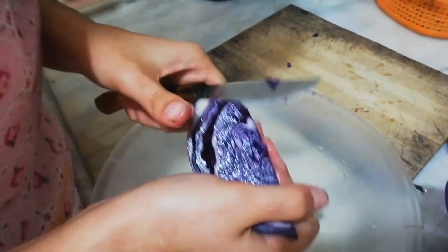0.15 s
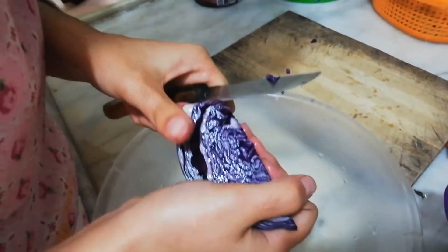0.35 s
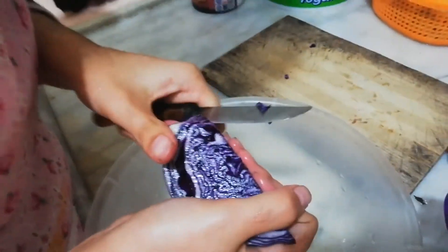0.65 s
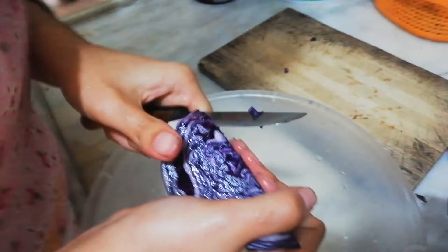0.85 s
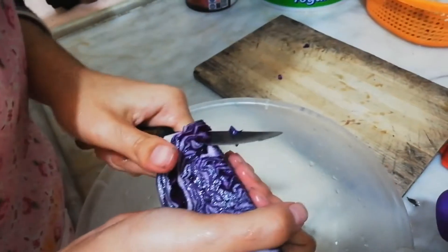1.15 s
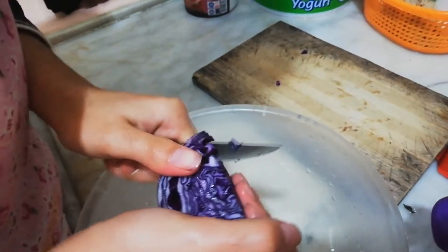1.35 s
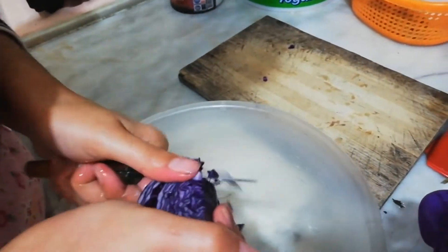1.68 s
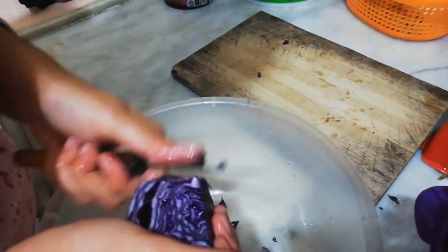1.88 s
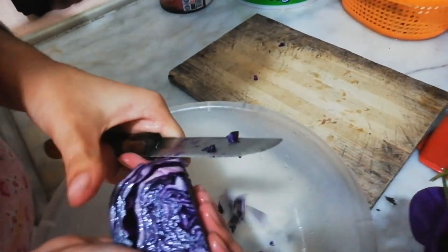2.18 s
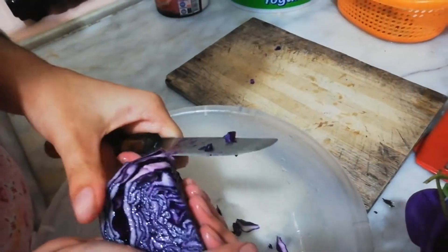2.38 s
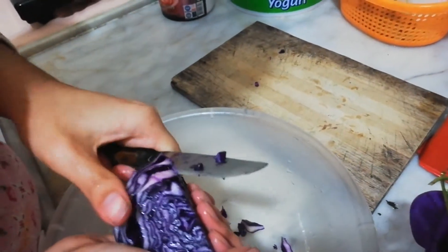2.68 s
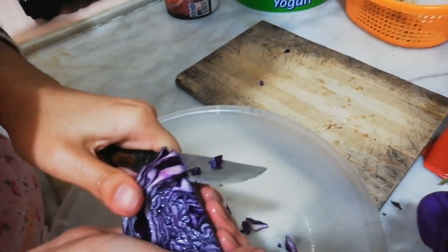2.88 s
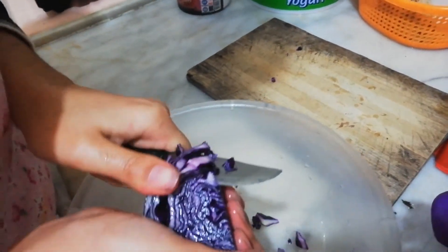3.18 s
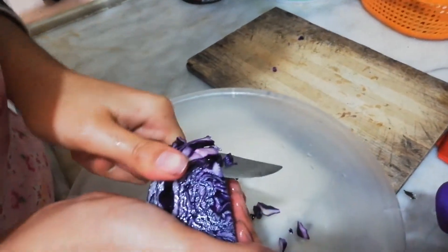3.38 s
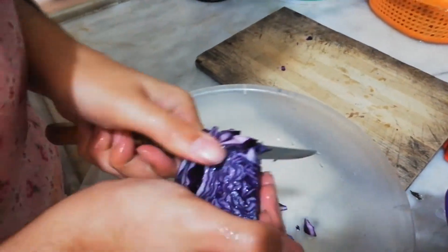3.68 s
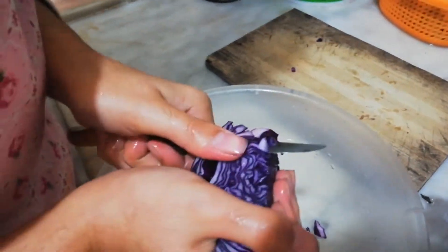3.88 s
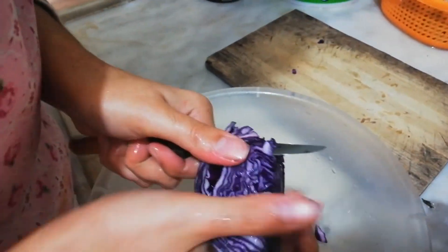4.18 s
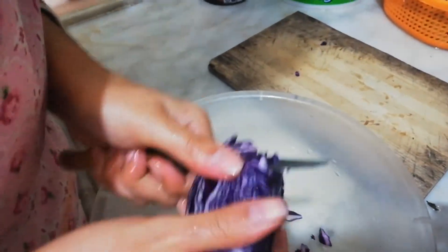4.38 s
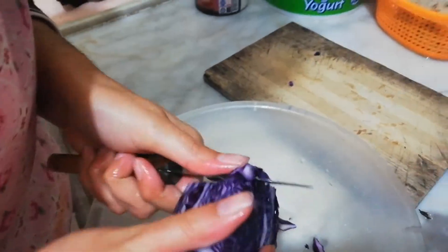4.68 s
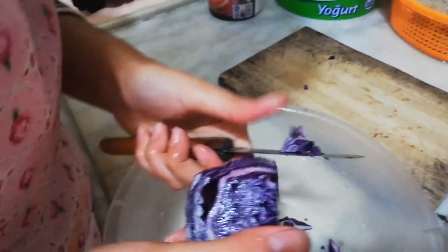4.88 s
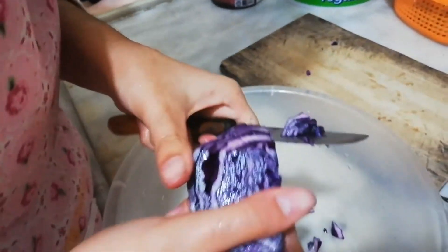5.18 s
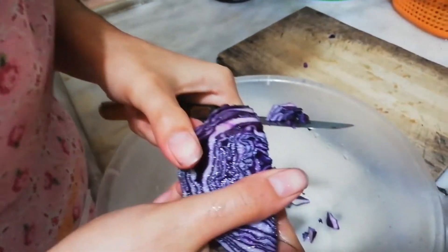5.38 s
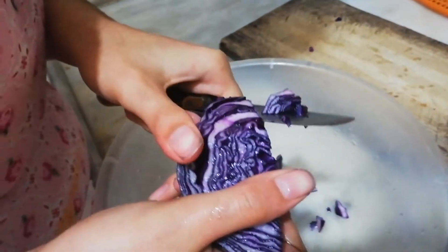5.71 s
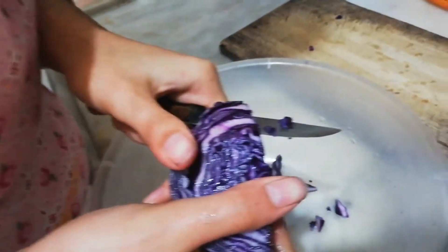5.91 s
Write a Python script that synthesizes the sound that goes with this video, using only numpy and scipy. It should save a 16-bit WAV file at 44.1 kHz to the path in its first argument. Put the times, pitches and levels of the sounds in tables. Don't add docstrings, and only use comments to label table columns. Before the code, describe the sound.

Close, bright cabbage crunches and fibre snaps, scraps dropping and bouncing in a plastic bowl, distant knocks and pan clatter, then water hissing into a steel sink.

```python
import sys
import numpy as np
from scipy import signal
from scipy.fft import rfft, irfft
from scipy.io import wavfile
from scipy.ndimage import uniform_filter1d

SR = 44100
rng = np.random.default_rng(int(sys.argv[2]) if len(sys.argv) > 2 else 0)


def master(y):
    cut = np.clip(np.atleast_2d(y).T, -1, 1)
    pcm = np.round(cut * 32767)
    wavfile.write(sys.argv[1], SR, pcm.astype(np.int16))


def gain_from_db(level_db):
    decades = np.asarray(level_db, float) / 20
    return 10 ** decades


N = 266805

# start_s, peak_db, length_ms, left_over_right_db
LEAVES = [(0.189, -44.5, 5.3, 3), (0.9362, -18, 5.3, 1), (1.1032, -12.5, 2.7, 1.5), (1.1581, -10, 4.3, 1),
          (1.4185, -13, 4.5, 1), (1.505, -14, 5.7, 0.5), (1.7133, -12, 7, 1.5), (2.618, -11, 7.7, 6),
          (2.6396, -13.5, 5.4, -2.5), (2.7755, -15.5, 5, 0), (2.8759, -16, 6.8, 2.5),
          (2.9856, -15, 11, 2.5), (3.1584, -12, 10.1, 2.5), (3.3437, -12.5, 5.9, -0.5),
          (3.5371, -16.5, 7.3, 8.5), (3.628, -30, 3.4, -2), (3.7715, -27, 4, -4), (3.7996, -29, 7.5, -6),
          (3.925, -13.5, 4.3, 0), (4.3205, -18, 4.5, 1.5), (4.341, -20, 5, 5), (4.3613, -27, 6.7, -2.5),
          (4.4263, -42.5, 6.3, 4), (5.3359, -15, 4.15, 1.5), (5.5462, -13, 8.8, -1), (5.8066, -9.5, 9.1, 1)]
# start_s, peak_db, length_ms, body_over_snap_db
RIBS = [(0.7399, -26.5, 9.2, 3.5), (.833, -30, 8, -14), (0.842, -15.5, 8, -14), (1.662, -19.5, 12.4, -10),
        (1.8994, -31, 6.2, -9), (2.5395, -30, 6, -14), (2.548, -23, 6, -14), (2.7352, -27.5, 7.7, -15.5),
        (4.093, -19.5, 5, -8), (4.5456, -14, 3, -23), (5.2934, -35, 6.8, -16), (6.0164, -20.5, 3.9, -1)]
# start_s, peak_db, body_over_snap_db
SNAPS = [(0.2364, -41.5, 1.5), (2.6155, -20, -20), (2.639, -13, -38), (2.933, -36, -30), (2.978, -30, -30),
         (3.0015, -19, -15), (3.0761, -44, -30), (3.0936, -43, -30), (3.154, -22, -30), (3.1624, -15, -30),
         (3.4847, -34, -30), (3.7202, -29, -25), (3.8549, -35, -25), (4.3195, -18, -25), (4.332, -33, -20),
         (3.1197, -21, -42), (3.1395, -28.5, -34), (3.605, -36, -20), (3.6421, -21, -15),
         (3.682, -10, -26.5), (3.875, -33, -30), (4.132, -26.5, 1.5), (4.2035, -30, -5), (4.6311, -26, -19),
         (4.6593, -44, -12), (4.706, -41, -7), (5.3243, -22, -15)]
# pitch_hz, level_db
FIZZ = [(400, -70), (1500, -30), (3000, -1.5), (6000, -2.5), (10000, 7), (16000, -16)]
# pitch_hz, level_db
SCRAPE = [(80, -54), (250, -8.5), (500, -14), (1300, -1.5), (2500, -5.5), (5000, -14.5)]
# start_s, peak_db, pitch_hz, tick_over_ring_db
DROPS = [(0.465, -40.5, 610, -11), (1.758, -30.5, 570, -32), (1.788, -41, 600, -32),
         (1.825, -40.5, 560, -26), (1.8652, -7, 1250, -30), (1.9565, -23, 1150, -30),
         (2.359, -30, 1220, -24), (3.746, -31, 1606, -9), (3.822, -39.5, 1320, -5), (4.251, -24, 640, -20),
         (4.641, -38, 1247, -5.5), (4.686, -28.5, 2240, -8), (4.735, -46.5, 1490, -8),
         (4.888, -24.5, 1180, -9), (4.896, -7, 1650, -16), (4.986, -16.5, 1410, -11.5),
         (4.989, -11, 1750, -11.5), (5.059, -34.5, 900, -8), (5.14, -37, 780, -32),
         (5.189, -21.5, 1390, -28.5),
         (1.8625, -20, 1000, -30), (1.875, -23, 1800, -30), (1.891, -27, 1200, -30),
           (1.671, -14, 1500, -30), (1.965, -25, 1200, -35), (4.089, -24, 1600, -30),
           (4.172, -20, 1500, -30), (4.901, -20, 2200, -30), (4.996, -24, 1200, -25), (5.066, -42, 2500, 0),
           (5.198, -30, 1700, -30)]
# start_s, peak_db, pitch_hz, tick_over_ring_db, thump_over_ring_db
CHUNKS = [
    (1.667, -5.5, 1600, -13.5, -19),
    (4.074, -15, 1300, -20, -3),
    (4.1315, -22, 1800, -3, -12),
    (4.168, -9, 1700, -32, -6),
    (4.976, -29.5, 1607, -24, -14),
    (5.034, -40, 428, -25, -12),
    (5.098, -30.5, 1300, -37, -17),
    (5.355, -31, 450, -25, -16),
    (6.002, -7, 550, -22, -8),
]
# pitch_hz, level_db
BOWL = [(250, -13.5), (500, -0.5), (1000, 3), (1500, 4), (2200, 4), (3200, 2), (4500, -24.5)]
# pitch_hz, level_db
TICK = [(1200, -50), (2500, 6), (5000, -2), (9000, -11), (14000, -27.5)]
# peak_s, fade_20_db_s, fizz_db, scrape_over_fizz_db
STROKES = [(0, 0.12, -50.5, 4.5), (.2, .5, -63.5, 0), (.6, 0.13, -50.5, -7.5), (1.1, 0.5, -52.5, 2.5),
           (1.45, 0.43, -46, -19), (1.615, .06, -50.5, 11.5), (1.685, 0.14, -41.5, -9),
           (1.892, 0.03, -71.5, 25), (2.44, 0.14, -66, 20), (2.6, 0.35, -51, -23), (2.95, .2, -50, -40),
           (3.34, .35, -47.5, -9.5), (3.55, 0.12, -41, -12), (3.645, .09, -39, -16), (3.69, .09, -38, -20),
           (3.77, .2, -35, -16), (4.11, .16, -44.5, -40), (4.5, 0.7, -58, -20), (4.9, 0.2, -60.5, -8),
           (5.25, 0.2, -57.5, -6)]
# start_s, level_db, rattle_s, thud_over_ring_db, brightness_db_per_octave
CLATTER = [
    (2.053, -23, 0.014, 2, -1.5),
    (2.077, -29, 0.022, 7, 2),
    (2.104, -34, .03, 7, 1),
    (2.14, -38, .03, 6, -1),
    (2.161, -33, 0.024, 7, -2.5),
    (2.18, -33.5, .026, 6, 1),
    (2.204, -37, 0.014, 6, -1),
    (2.226, -44, .012, 9, -5),
    (2.243, -29, .02, 0, 1.5),
]
# pitch_hz, level_db, fade_60_db_s
PAN = [(1927, 3, 0.06), (2530, -2, .05), (2700, 5, 0.07), (3750, -3, 0.06), (3950, 3, 0.045),
       (5600, -8, 0.15), (6503, -1, 0.2), (7000, -4, .15), (7720, 4, 0.23), (8600, -2, 0.15),
       (9114, 3, .14), (9590, -1, 0.08), (10300, -2, .15), (10900, -3, 0.17)]
# pitch_hz, level_db
THUD = [(71, -29), (370, -4.5), (1400, -10), (3900, -11.5), (4700, -23), (9400, -5.5), (14700, -23.5),
        (16000, -42.5)]
# start_s, level_db, rattle_s, thud_over_ring_db
SETTLING = [
    (2.394, -42, .025, -3),
    (2.43, -49, .015, -4),
    (2.475, -39, .006, -10),
    (2.485, -39, .01, -9),
]
# pitch_hz, level_db, fade_60_db_s
RIM = [(420, -7, .06), (2530, 2, .05), (2720, 2, .08), (3850, -8, .05), (6500, -17, .08), (9000, -13, .06)]
# start_s, level_db, rattle_s
KNOCKS = [
    (0.5855, -30, 0.065),
    (0.9665, -31, 0.05),
]
# pitch_hz, level_db, fade_60_db_s
CUPBOARD = [(280, -5.5, 1.0), (424, 7, 2.9), (761, 21, 0.28), (1040, -10.5, 1.1), (1216, 20, 0.47),
            (1561, -16, 0.35), (1477, 22, 0.73), (1740, -6, 1.1), (1900, 21, 0.54), (2630, 7, 0.27),
            (2760, -0.5, 1), (3526, -15, 0.95), (3736, -6.5, 1.4), (4500, 8, 0.11)]
# pitch_hz, level_db
KNOCK_AIR = [(150, -40), (450, -30), (660, -5), (1300, -7), (1950, -6), (2500, -13), (5000, -20),
             (9580, -22), (15500, -45)]
# start_s, length_s, pitch_hz
RINGS = [(0, .56, 293), (0, .45, 349), (.72, .26, 262), (.99, .14, 272), (1., .6, 415), (1.15, .45, 282),
         (3.18, .16, 1225), (3.29, .07, 275), (3.31, .08, 349), (3.36, .09, 425), (3.42, .09, 340),
         (3.385, .05, 265)]
RINGS_DB = [-58, -69, -57, -47, -61, -57, -58, -57, -60, -57, -60, -57]
# time_s, flow_db, gurgle_over_flow_db
FLOW = [
    (5.24, -69, -10),
    (5.308, -47.5, 3),
    (5.448, -39.5, -6),
    (5.724, -32.5, -18),
    (6.05, -33.5, 6),
]
# pitch_hz, level_db
SPRAY = [(200, -56), (806, -25), (1600, -13), (2380, -21), (2860, -13.5), (5500, -10), (14600, -15.5),
         (16000, -49.5)]
# pitch_hz, width_hz, level_db
SINK = [(2450, 40, 4), (4020, 56, 0), (4350, 65, 0), (4810, 74, 2.5), (4960, 133, 2), (5410, 54, 4),
        (5560, 11, -7)]
# peak_s, half_length_s, level_db, pitch_hz
HUM = [(0, .15, -55, 119), (.32, 0.23, -56, 112), (0.818, .28, -50, 114.5), (1.3, 0.21, -61, 118),
       (1.863, 0.29, -54.5, 115), (2.122, 0.088, -40, 113), (2.27, 0.11, -47.5, 120.5),
       (2.499, 0.24, -53, 111.5), (3.018, 0.19, -55, 116), (3.5, .45, -57.5, 115),
       (4.027, 0.18, -53.5, 114), (4.598, 0.43, -47.5, 113.5), (5.1, 0.19, -48, 114),
       (5.377, 0.3, -45.5, 113.5), (5.835, .17, -52.5, 114)]
# pitch_hz, level_db
OPENING = [(35, -40), (250, -5), (593, 3), (903, -17.5), (2190, -11), (9790, -21), (14600, -30),
           (16000, -90)]
# pitch_hz, level_db
FLOOR = [(12, -29), (20, 55.5), (65, -47), (120, -12), (190, -25), (600, -27), (9950, -40.5), (16000, -48)]
# pitch_hz, likeness
SAME = [(60, .995), (130, .97), (290, .25), (640, -.35), (1400, .15), (3100, 0)]
# pitch_hz, fade_60_db_s
KITCHEN = [(150, 0.58), (500, 0.65), (1500, 0.34), (4000, 0.3), (10000, 0.23)]
# pitch_hz, level_db
PORTS = [(4000, 0), (9000, 1), (13000, -3)]
# pitch_hz, level_db
ROLL_OFF = [(15050, 0), (15350, -22), (16500, -30)]


def evened(x):
    return x / np.sqrt(np.mean(x ** 2) + 1e-20)


def read(points, hz):
    f, value = np.transpose(points)
    return np.interp(np.log(hz + 1), np.log(f + 1), value)


def coloured(x, points):
    n = x.shape[-1]
    return irfft(rfft(x) * gain_from_db(read(points, np.fft.rfftfreq(n, 1 / SR))), n)


def resonate(x, hz, width):
    turn = np.exp(2j * np.pi * np.cumsum(hz * np.ones(x.shape[-1])) / SR)
    r = np.exp(-np.pi * width / SR)
    return 2 * (turn * signal.lfilter([1 - r], [1, -r], x / turn)).real


def add(mix, s, sound, pan_db, lag_ms):
    for port, side in enumerate((.5, -.5)):
        first = max(round((s + side * lag_ms / 1000) * SR), 0)
        part = mix[port, first:][:len(sound)]
        part += gain_from_db(side * pan_db) * sound[:len(part)]


def diffuse(points, patchy_db):
    hz = np.fft.rfftfreq(1024, 1 / SR)
    a, b, c, d, patches = rng.standard_normal((N // 256 + 5, 513, 5)).T
    patches = uniform_filter1d(uniform_filter1d(patches, size=10, axis=0), size=10, axis=1)
    level = gain_from_db(read(points, hz)[:, None] + patchy_db * evened(patches))
    same = np.clip(read(SAME, hz), -1, 1)[:, None]
    left = a + 1j * b
    right = same * left + np.sqrt(1 - same ** 2) * (c + 1j * d)
    noise = signal.istft(np.array([left, right]) * level, nperseg=1024, noverlap=768)[1]
    return evened(noise[:, :N])


def grains(n, per_s, spread_db):
    size = gain_from_db(spread_db * np.minimum(rng.exponential(1, n), 4)) * rng.standard_normal(n)
    return evened(size * (rng.random(n) < per_s / SR))


def crunches():
    out, t = np.zeros((2, N)), np.arange(3000) / SR - .008
    leaf_body_db, rib_pan_db, snap_ms, snap_pan_db = -21, 1, .6, 3
    rows = [(s, db, ms, leaf_body_db, pan_db) for s, db, ms, pan_db in LEAVES]
    rows += [(*row, rib_pan_db) for row in RIBS]
    rows += [(s, db + 1, snap_ms, body_db, snap_pan_db) for s, db, body_db in SNAPS]
    for s, db, ms, body_db, pan_db in rows:
        u = t / (ms / 1000)
        swell = np.exp(-((u - .3) / 0.6) ** 2)
        tail = 0.22 * np.tanh(3 * u) * np.exp(-t / (0.004 + 0.0013 * ms))
        shape = np.where(u < .3, swell, np.exp(-abs(u - .3) ** 2.4) + tail)
        for share, lag_ms, turn_db in ((1, -.18, 0), (.65, -.4, 6), (.65, .1, -6)):
            cracks = grains(3000, 9000, 2.8) * shape
            snap, body = coloured(cracks, FIZZ), coloured(cracks, SCRAPE)
            sound = (snap + gain_from_db(body_db + 16.5) * body) / abs(snap).max()
            add(out, s - .0075, share * gain_from_db(db - 1.5) * sound, pan_db + turn_db, lag_ms)
    return out


def drops():
    out, t = np.zeros((2, N)), np.arange(6000) / SR
    light_thump_db = -26
    hollow_hz, hollow_s, hollow_db = (520, 610), .13, -7
    steep = signal.butter(4, 250, 'high', fs=SR, output='sos')
    rows = [(*row, light_thump_db) for row in DROPS] + CHUNKS
    for s, db, hz, tick_db, thump_db in rows:
        t60 = .033 * (1000 / hz) ** .6
        f = np.geomspace(200, 4400, num=36)[:, None] * rng.uniform(.95, 1.05, (36, 1))
        scatter_db = 1.5 * rng.standard_normal(f.shape)
        octaves = .7 * (hz / 1500) ** .8
        wall = gain_from_db(-6 * (np.log2(f / hz) / octaves) ** 2)
        broad_tap = gain_from_db(-10 - 8 * np.log2(f / 2100) ** 2 - 60 * t / 0.025)
        rim = gain_from_db(-15 - 12 * np.log2(f / 3000) ** 2)
        wall = wall + min(hz / 1100, 1) ** 2 * (broad_tap + rim)
        base = gain_from_db(thump_db + 6.0 - 7.9 * (np.log2(f / 320) / 0.55) ** 2)
        late = np.maximum(t - .003 * rng.random(f.shape) ** 4, 0)
        decay = gain_from_db(-60 * late * (f / hz) ** 0.61 / t60) * (1 - np.exp(-late * f * 2))
        sign = np.sign(rng.random(f.shape) - .3 * (f < 1000))
        modes = sign * gain_from_db(read(BOWL, f) + scatter_db) * np.sin(2 * np.pi * f * late) * decay
        soft_start = np.tanh(t / .002)
        ring = signal.sosfilt(steep, (wall * modes).sum(0)) + (base * modes).sum(0) * soft_start
        hollow = sum(np.sin(2 * np.pi * pair_hz * rng.uniform(.92, 1.08) * t) for pair_hz in hollow_hz)
        off_pitch = abs(np.log2(hz / hollow_hz[0]))
        hollow = gain_from_db(hollow_db - 13 * off_pitch - 60 * t / hollow_s) * hollow * soft_start / 2
        ring = ring / abs(ring).max() + hollow
        flick = np.exp(-t / .002) * np.tanh(t / .0005) + .04 * np.exp(-t / .01)
        tick = coloured(rng.standard_normal(6000) * flick, TICK) * np.exp(-t / 0.032)
        sound = ring / abs(ring).max() + gain_from_db(tick_db + 12.5) * tick / abs(tick).max()
        add(out, s + 0.0012, gain_from_db(db) * sound, 1.5, -.1)
    return out


def rubbing():
    s, fade, fizz_db, scrape_db = np.transpose(STROKES)[:, :, None]
    stroke = gain_from_db(fizz_db - 20 * abs(np.arange(N) / SR - s) / fade)
    crackle = evened(coloured(np.array([grains(N, 3600, 1.7), grains(N, 3000, 4.3)]), FIZZ))
    grip = evened(uniform_filter1d(uniform_filter1d(rng.standard_normal(N), size=700), size=700))
    fizz = (0.43 * diffuse(FIZZ, 2) + 0.29 * crackle) * gain_from_db(2.5 * grip)
    scrape = diffuse(SCRAPE, 2.5)
    return stroke.sum(0) * fizz + (stroke * gain_from_db(scrape_db)).sum(0) * scrape


def rattle(length, rise, modes, longest, air, air_db):
    t, head = np.arange(SR) / SR, SR // 30
    burst = grains(SR, 6000, 0.97) * np.exp(-(t / length) ** 2) * np.tanh(t / rise)
    twins = rng.normal(1, .008, (len(modes), 4))
    ring = 0
    for (hz, db, t60), twin in zip(modes, twins):
        tones = np.sin(2 * np.pi * hz * twin[:, None] * t).sum(0)
        ring = ring + gain_from_db(db - 60 * t / min(t60, longest)) * tones
    ring = signal.fftconvolve(burst, ring)[:SR]
    ring = coloured(ring, [(60, -35), (140, 0)]) * (1 - t) ** 4
    puff = coloured(burst, air) * (1 - t) ** 4
    return ring / ring[:head].std() + gain_from_db(air_db) * puff / puff[:head].std()


def pan():
    out, t = np.zeros((2, N)), np.arange(SR // 4) / SR
    damped = .11
    for s, db, length, thud_db, tilt_db in CLATTER:
        struck = [(hz, mode_db + tilt_db * np.log2(hz / 4000), t60) for hz, mode_db, t60 in PAN]
        air = [(hz, air_db + 0.6 * tilt_db * np.log2(max(hz, 1000) / 4000)) for hz, air_db in THUD]
        add(out, s, gain_from_db(db) * rattle(length, .0012, struck, damped, air, thud_db), -5.0, .6)
    for s, db, length, thud_db in SETTLING:
        add(out, s, gain_from_db(db) * rattle(length, .002, RIM, .08, THUD, thud_db), -5.0, .6)
    counter = ((84.6, -31.5, 0.15), (260.5, -21.5, 0.11), (349, -23.5, 0.14))  # pitch_hz, level_db, fade_60_db_s
    bump = sum(gain_from_db(db - 60 * t / t60) * np.sin(2 * np.pi * hz * t) for hz, db, t60 in counter)
    add(out, CLATTER[0][0], bump * np.tanh(t / 0.0045), -1.0, .2)
    return out


def cupboard():
    out = np.zeros((2, N))
    for s, db, length in KNOCKS:
        add(out, s, gain_from_db(db) * rattle(length, 0.0012, CUPBOARD, 0.32, KNOCK_AIR, 10.0), -4.0, .6)
    for (s, length, hz), db in zip(RINGS, RINGS_DB):
        t = np.arange(round(length * SR)) / SR
        wobble = gain_from_db(3 * np.sin(2 * np.pi * (9 * t + rng.random())))
        tone = np.sin(2 * np.pi * hz * t) * signal.windows.tukey(len(t), .3)
        add(out, s, gain_from_db(db) * wobble * tone, -1.5, .4)
    return out


def tap():
    s, flow_db, gurgle_db = np.transpose(FLOW)
    t = np.arange(N) / SR
    drum = np.array([grains(N, 5000, 6.0), grains(N, 5000, 1.2)])
    steel = evened(sum(gain_from_db(db) * evened(resonate(drum, hz, width)) for hz, width, db in SINK))
    gurgle = evened(resonate(resonate(drum, 413, 162), 412, 131))
    gurgle = gurgle * gain_from_db(np.interp(t, s, gurgle_db) - 18.5)
    flow = gain_from_db(np.interp(t, s, flow_db)) * np.clip((t - s[0]) / 0.022, 0, 1)
    return flow * (diffuse(SPRAY, 3.1) + gain_from_db(-4.0) * steel + gurgle) * gain_from_db([[-1], [1.5]])


def hum():
    s, half, db, hz = np.transpose(HUM)[:, :, None]
    t = np.arange(N) / SR
    pitch = np.interp(t, s[:, 0], hz[:, 0])
    swell = (gain_from_db(db) * np.cos(np.pi / 2 * np.clip((t - s) / half, -1, 1))).sum(0)
    tone = np.sqrt(2) * np.sin(2 * np.pi * np.cumsum(pitch) / SR)
    fuzz = evened(resonate(resonate(rng.standard_normal(N), pitch, 37.9), pitch, 35))
    return swell * (tone + .3 * fuzz)


def opening():
    t = np.arange(N) / SR
    cut = 1 + np.exp(np.minimum((t - .09) / 0.0091, 50))
    return gain_from_db(-30.5 - 170 * t) * diffuse(OPENING, 4.0) / cut


def room(x):
    hz, t, z = signal.stft(rng.standard_normal((2, SR)), SR, nperseg=256)
    tail = signal.istft(z * gain_from_db(-60 * t / read(KITCHEN, hz)[:, None]), SR, nperseg=256)[1]
    tail = tail * np.clip(np.arange(tail.shape[1]) / SR / 0.0017 - .5, 0, 1)
    return signal.fftconvolve(x, tail / np.linalg.norm(tail[0]), axes=1)[:, :N]


def scene():
    near, far, steel = crunches() + drops(), cupboard(), pan()
    wet = room(gain_from_db(-14.5) * near + gain_from_db(-4.5) * far + gain_from_db(-11.0) * steel)
    direct = near + gain_from_db(-5.5) * far + steel
    background = tap() + hum() + opening() + gain_from_db(-62) * diffuse(FLOOR, 1.5)
    return direct + wet + rubbing() + background


def band_limit(x):
    return signal.sosfilt(signal.butter(12, 16500, fs=SR, output="sos"), x)


def record(dry):
    bright = dry + 0.65 * resonate(dry, 8780, 1620)
    bright = np.array([coloured(bright[0], PORTS), bright[1]])
    mix = coloured(np.tanh(bright), ROLL_OFF)
    return band_limit(mix)


dry = scene()
out = record(dry)
master(out)
```